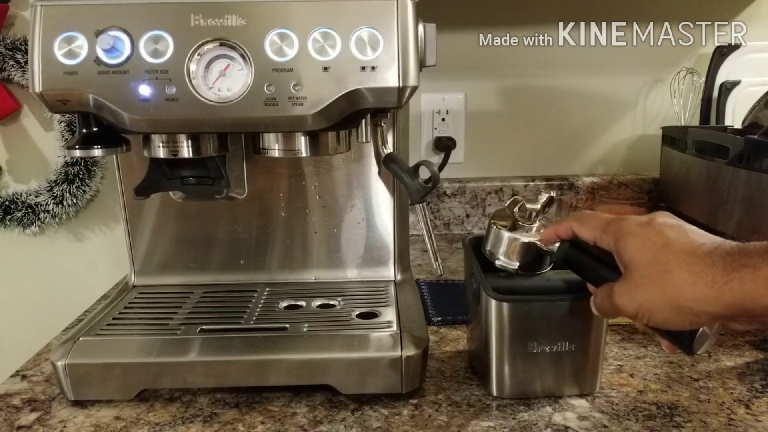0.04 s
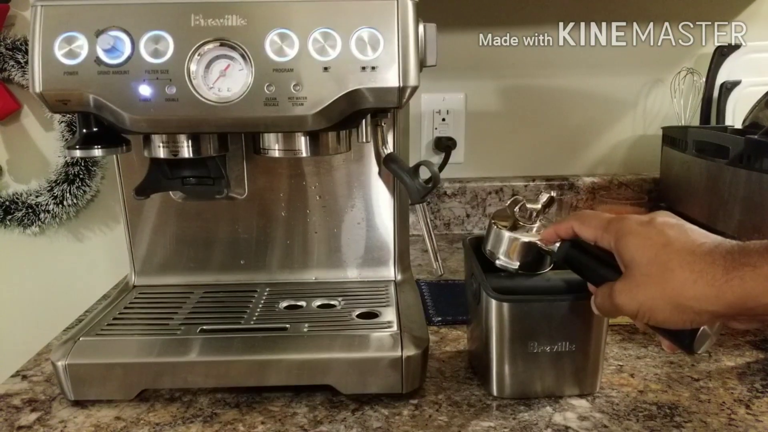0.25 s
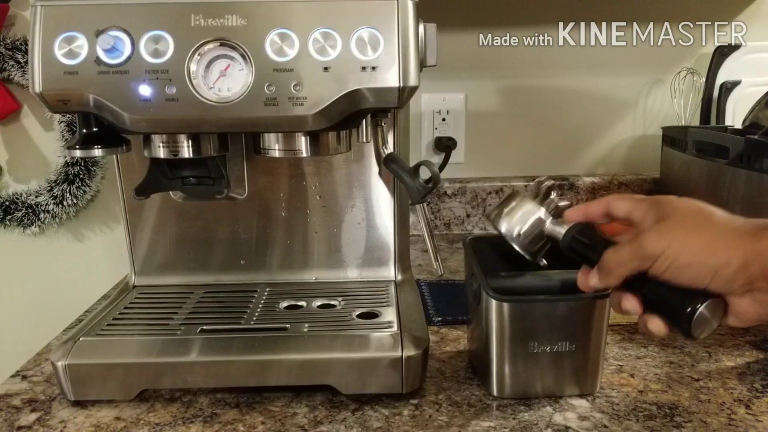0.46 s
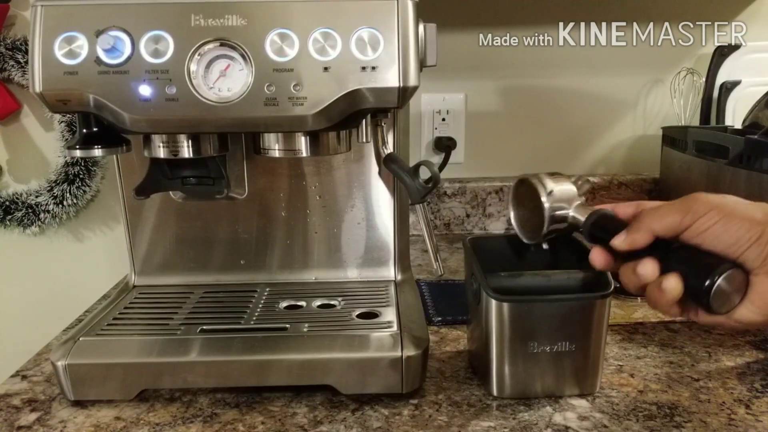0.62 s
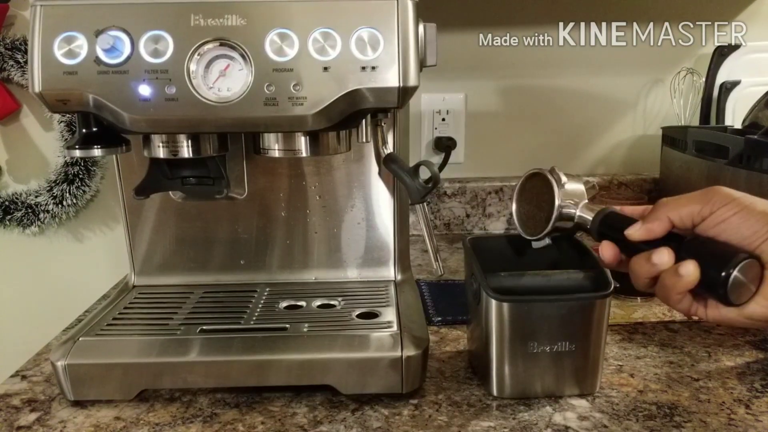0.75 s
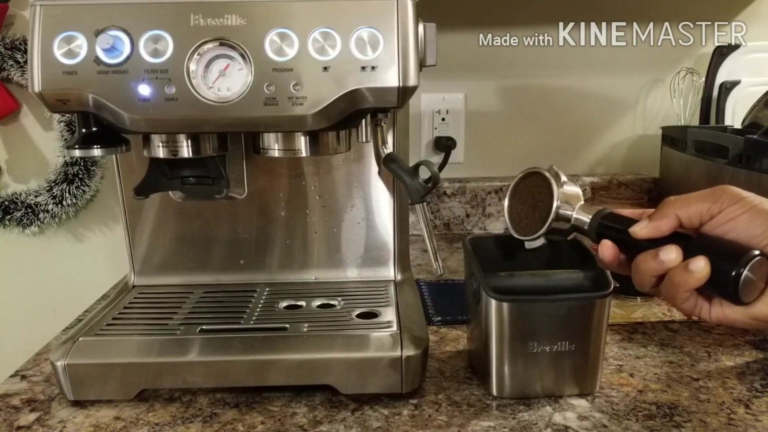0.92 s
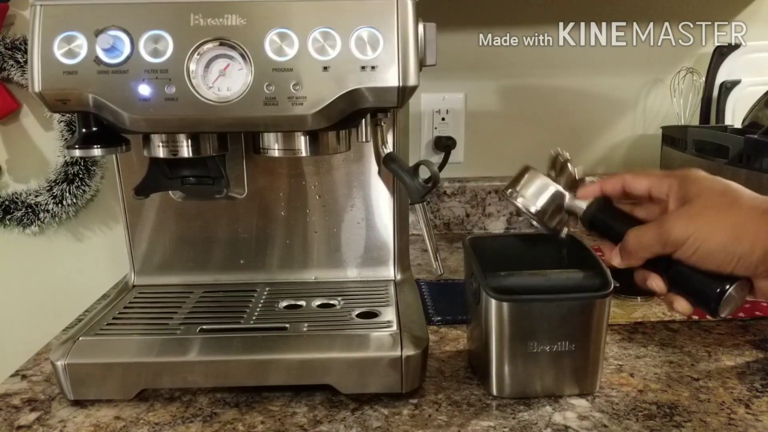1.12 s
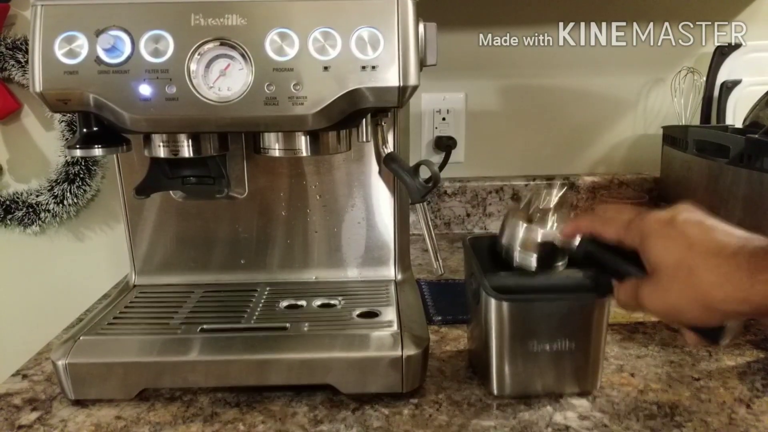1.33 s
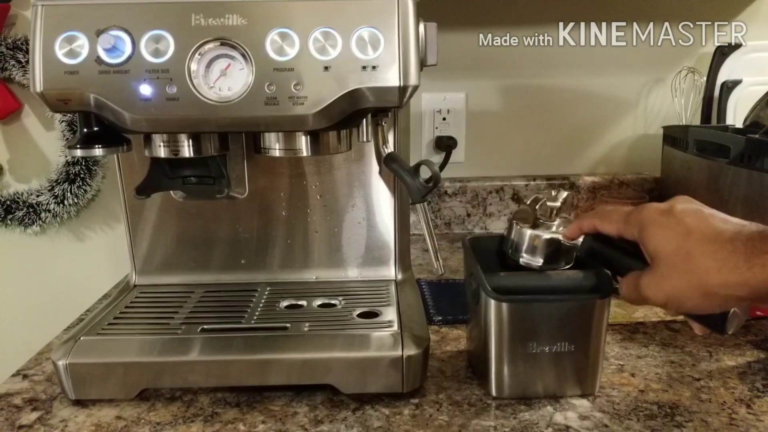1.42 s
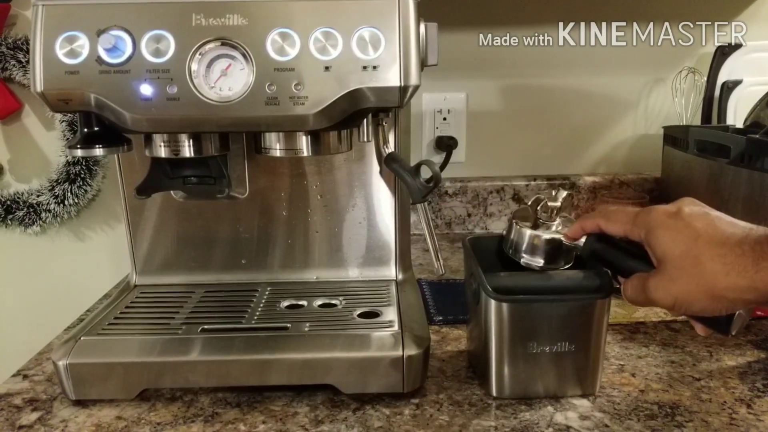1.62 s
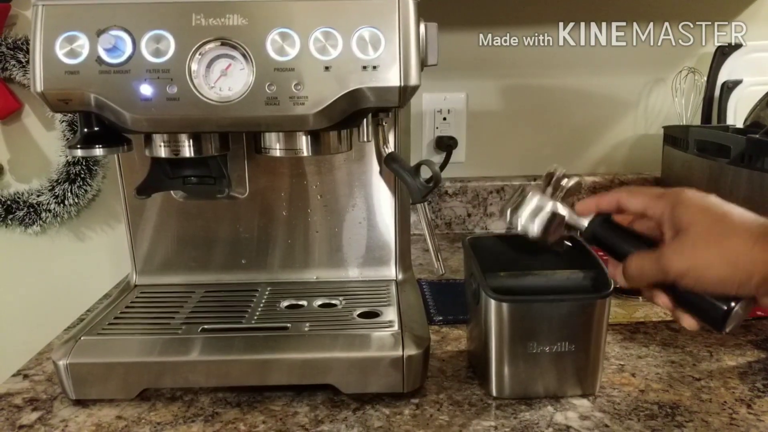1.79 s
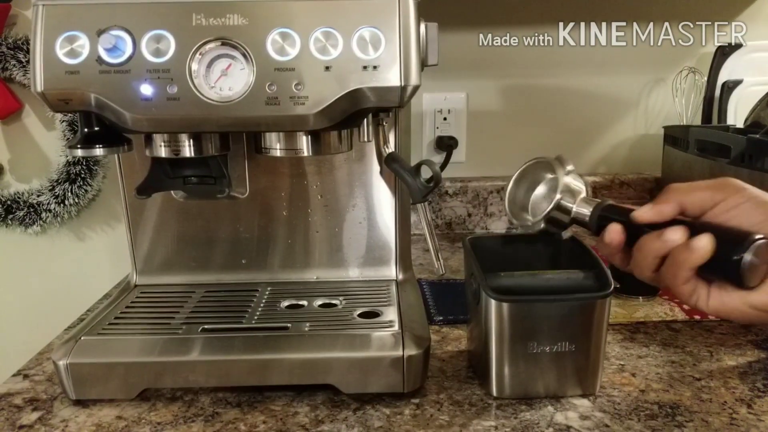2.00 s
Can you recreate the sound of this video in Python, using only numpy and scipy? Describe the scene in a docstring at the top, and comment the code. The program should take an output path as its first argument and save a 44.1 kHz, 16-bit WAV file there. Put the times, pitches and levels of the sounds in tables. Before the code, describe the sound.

A metal coffee filter holder bangs hard on a steel knock box, which rings briefly, then its rim taps the box lightly. An appliance hums faintly in the kitchen, and the bang slightly overloads the microphone.

```python
"""The ring of a knock dies away in a kitchen, over the steady hum of a mains-driven appliance.
Then a metal coffee filter holder is knocked hard on the bar of a steel knock box: the contact
cracks, the box rings and the room answers. The holder's rim then taps the box lightly.
The hard knock overloads the recorder, whose gain control then holds the hum down."""
import sys
import numpy as np
from scipy import signal
from scipy.fft import irfft
from scipy.io import wavfile
from scipy.ndimage import uniform_filter1d

SR = 44100
rng = np.random.default_rng(int(sys.argv[2]) if len(sys.argv) > 2 else 0)


def generate_wav(signal):
    """Clip the signal to [-1, 1] and save it as 16-bit WAV at the path in sys.argv[1]."""
    frames = np.transpose(np.atleast_2d(signal))
    scaled = np.clip(frames, -1, 1) * 32767
    pcm = np.round(scaled).astype(np.int16)
    wavfile.write(sys.argv[1], SR, pcm)


N = 90449
HIT_TIME = np.arange(round(.8 * SR)) / SR  # s since contact, for one hit and its tail


def amp(db):
    return 10 ** (np.asarray(db) / 20)


def unit_rms(x):
    return x / np.sqrt(np.mean(x ** 2) + 1e-20)


def curve_at(points, hz):
    """Joins points by straight lines on a log-frequency axis."""
    f, value = np.transpose(points)
    return np.interp(np.log(hz + 1), np.log(f + 1), value)


def place(mix, start_s, sound):
    """Mixes a sound in at its cue, which may lie before the start."""
    at = round(start_s * SR)
    sound = sound[max(-at, 0):]
    part = mix[max(at, 0):][:len(sound)]
    part += sound[:len(part)]


def noise(colour, size):
    """Noise of rms 1: the colour sets only its tonal balance."""
    hz = np.fft.rfftfreq(size, 1 / SR)
    phases = np.exp(2j * np.pi * rng.random(len(hz)))
    return unit_rms(irfft(amp(curve_at(colour, hz)) * phases, size))


# Colour of the room tone: (f/Hz, level/dB)
ROOM_COLOUR = [(20, -12), (32, -14), (50, 4.5), (85, -9.5), (130, 1), (220, -10), (500, -14), (800, -21),
               (1250, -28), (1800, -39), (2400, -41.5), (3200, -38), (4300, -41.5), (5800, -40),
               (7000, -36.5), (9500, -41), (12000, -46.5), (15500, -49)]
def room_tone():
    """A faint, bass-heavy rush under everything."""
    return amp(-51) * noise(ROOM_COLOUR, N)


# Body of the hum: (multiple of the mains frequency, rms level/dB)
HUM_HARMONICS = [(1, -61), (2, -57.5), (3, -62.5), (4, -66.5), (5, -59.5), (6, -59.5), (7, -71), (8, -67.5),
                 (9, -62.5), (10, -65.5)]
# Thin whine on top: (f/Hz, rms level/dB)
WHINE_TONES = [(1502, -84.5), (2783, -91), (3435, -88.5), (6858, -97)]
def appliance_hum(mains_hz=59.8, waver_depth=.25, waver_max_hz=4.99):
    """Mains harmonics and a whine, each tone wavering in level on its own."""
    t, out = np.arange(N) / SR, np.zeros(N)
    harmonics = [(round(k) * mains_hz, db) for k, db in HUM_HARMONICS]
    for hz, db in harmonics + WHINE_TONES:
        rates, phases = rng.random((2, 8, 1))
        waver = unit_rms(np.sin(2 * np.pi * (waver_max_hz * rates * t + phases)).sum(0))
        tone = np.sqrt(2) * np.sin(2 * np.pi * (hz * t + rng.random()))
        out += amp(db) * (1 + waver_depth * waver) * tone
    return out


# Reverb time of the kitchen: (f/Hz, t60/s)
KITCHEN_DECAY = [(60, .7), (210, 0.39), (560, .36), (1470, 0.38), (3880, .36), (10200, 0.32), (15000, .26)]
def kitchen_reverb(colour, t, predelay_s=.005, build_s=.041):
    """Reflections of a short burst build up, and each band dies at its own speed."""
    hz, age, bands = signal.stft(noise(colour, len(t)), SR, nperseg=512)
    decay = amp(-60 * age / curve_at(KITCHEN_DECAY, hz)[:, None])
    tail = signal.istft(bands * decay, SR)[1][:len(t)]
    return tail * np.sqrt(np.clip((t - predelay_s) / build_s, 0, 1))


def box_ring(modes, t, attack_s):
    """The box's modes: dying sines that swell while the contact lasts."""
    phases = rng.random(len(modes))
    sines = sum(amp(db - 60 * t / t60) * np.sin(2 * np.pi * (hz * t + phase))
                for (hz, db, t60), phase in zip(modes, phases))
    return np.minimum(t / attack_s, 1) * sines


# Cues for the rim touching the box: (t/s, thud level/dB, tick level/dB)
TAP_CUES = [(1.8705, -42, -48.5), (1.878, -31, -41.5)]
# Colour of the tick: (f/Hz, level/dB)
TICK_COLOUR = [(200, -8), (700, -2), (1300, 5), (2000, 1), (3000, -8.5), (4500, -18), (8000, -22),
               (15000, -27)]
# Thud of the box rocking on the counter: (f/Hz, level/dB, t60/s)
THUD_MODES = [(121.7, 0, 0.27), (139.5, -0.5, 0.25), (168, 2, .08)]
def rim_taps(tick_t60_s=.03, reverb_db=-11):
    """The rim ticks against the box, which answers with a low thud."""
    t, out = HIT_TIME, np.zeros(N)
    for start_s, thud_db, tick_db in TAP_CUES:
        tick = amp(-60 * t / tick_t60_s) * noise(TICK_COLOUR, len(t))
        reverb = amp(reverb_db) * kitchen_reverb(TICK_COLOUR, t)
        thud = box_ring(THUD_MODES, t, attack_s=.0026)
        place(out, start_s, amp(thud_db) * thud + amp(tick_db) * (tick + reverb))
    return out


# Cues for the holder hitting the bar: (t/s, ring level/dB, crack level/dB, low-pass f/Hz)
KNOCK_CUES = [(-0.04, -21.5, -21.5, 1330), (1.386, 0, 0, 11950), (1.4215, -2.5, -4.5, 5000),
              (1.596, -28.5, -36, 9000)]
# Ring of the steel box with the holder on it: (f/Hz, level/dB, t60/s)
BOX_MODES = [(101, -18, .45), (120.8, -10, .5), (139.3, -4, 0.29), (167.1, -5.5, 0.27), (202.3, -8, .28),
             (240.3, -12.5, 0.22), (334.9, -6, .3), (379.6, -6, .33), (447, -13, .3), (489.7, -10, .31),
             (549, -9, .3), (645.2, -4.5, .24), (823, -13.5, .27), (3145, -32.5, .28)]
# Colour of the contact's crack: (f/Hz, level/dB)
CRACK_COLOUR = [(30, -22.5), (120, -1.5), (600, 8.5), (1000, -0.5), (1500, -5), (2500, -19), (4500, -18),
                (10000, -26.5), (15500, -33)]
# Colour of a knock as the kitchen returns it: (f/Hz, level/dB)
REVERB_COLOUR = [(25, -23), (70, -14), (120, -2.5), (250, -1), (600, -1), (1000, -10), (2000, -19),
                 (4200, -25.5), (6000, -32), (11000, -34.5), (15500, -44.5)]
def holder_knocks(crack_trim_db=-6, crack_t60_s=.05, reverb_db=-.5, low_cut_hz=28):
    """Each blow cracks, rings the box and fills the kitchen; a soft contact is duller."""
    t, out = HIT_TIME, np.zeros(N)
    for start_s, ring_db, crack_db, lowpass_hz in KNOCK_CUES:
        crack = amp(crack_trim_db - 60 * t / crack_t60_s) * noise(CRACK_COLOUR, len(t))
        ring = box_ring(BOX_MODES, t, attack_s=.003)
        reverb = amp(reverb_db) * kitchen_reverb(REVERB_COLOUR, t)
        blow = amp(ring_db) * ring + amp(crack_db) * (crack + reverb)
        pole = np.exp(-2 * np.pi * lowpass_hz / SR)
        place(out, start_s, signal.lfilter([1 - pole], [1, -pole], blow))
    return signal.sosfilt(signal.butter(2, low_cut_hz, "high", fs=SR, output="sos"), out)


def scene():
    """Knocks and taps over the bed of room tone and hum, in mono."""
    return (holder_knocks() + rim_taps() + room_tone() + appliance_hum())[None]


def record(dry):
    """Gain control ducks at once and keeps sinking slowly; peaks clip softly; the top end is cut."""
    threshold_db, ratio, held_climb_db_per_s, window_s = -6, 8, 4.5, .008
    clip_knee, high_cut_hz = .7, 15550
    power = uniform_filter1d(dry[0] ** 2, round(window_s * SR))
    level_db = 10 * np.log10(abs(power) + 1e-12)
    climb_db = np.arange(N) / SR * held_climb_db_per_s
    held_db = np.maximum.accumulate(level_db - climb_db) + climb_db  # the held peak creeps upward
    over_db = np.maximum(held_db - threshold_db, 0)
    ducked = dry * amp(-(1 - 1 / ratio) * uniform_filter1d(over_db, size=128))
    core = np.clip(ducked, -clip_knee, clip_knee)
    rounded = core + (1 - clip_knee) * np.tanh((ducked - core) / (1 - clip_knee))
    high_cut = signal.firwin(511, high_cut_hz, window=("kaiser", 9), fs=SR)
    return signal.oaconvolve(rounded, high_cut[None], "same")


dry = scene()
out = record(dry)
generate_wav(out)
```